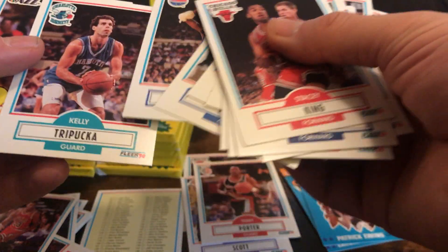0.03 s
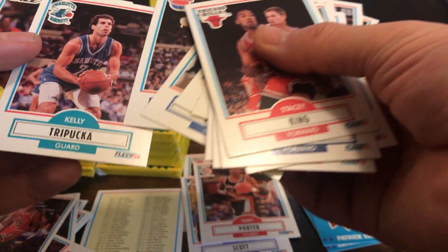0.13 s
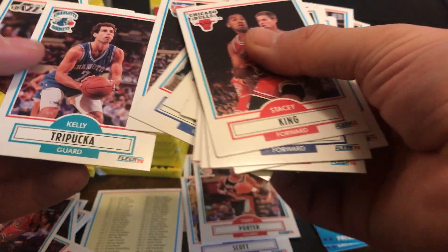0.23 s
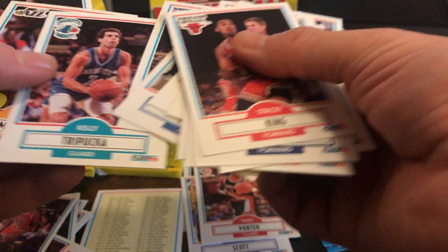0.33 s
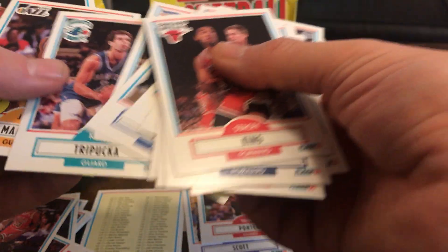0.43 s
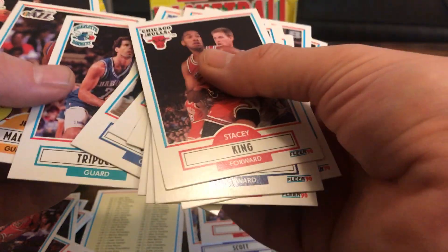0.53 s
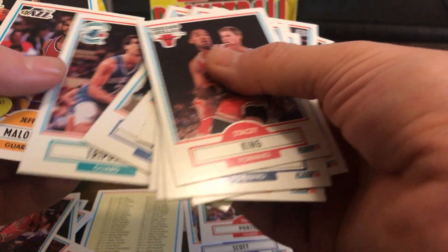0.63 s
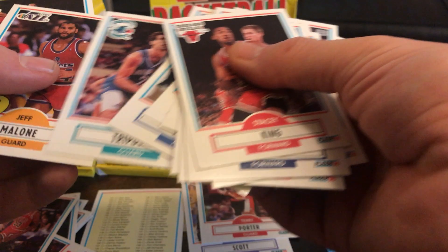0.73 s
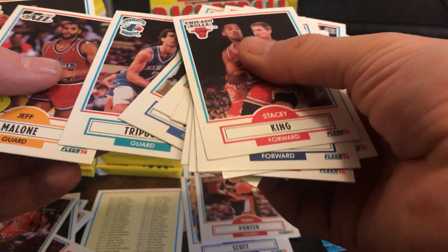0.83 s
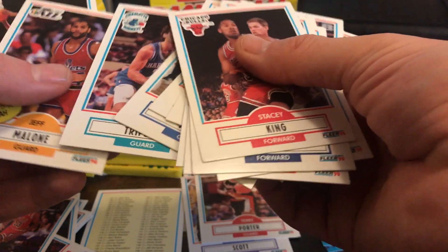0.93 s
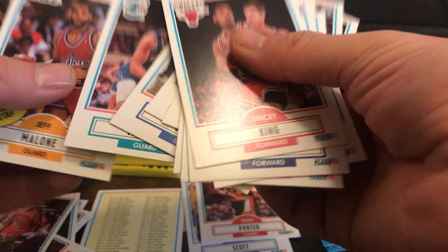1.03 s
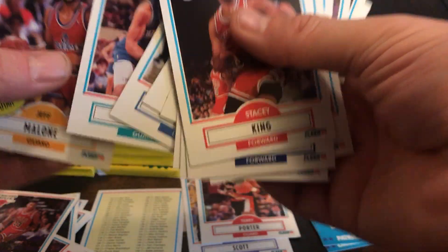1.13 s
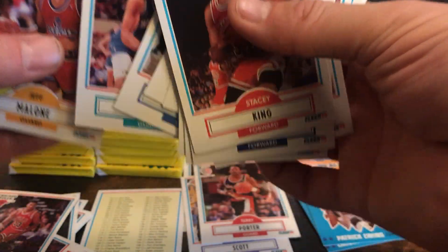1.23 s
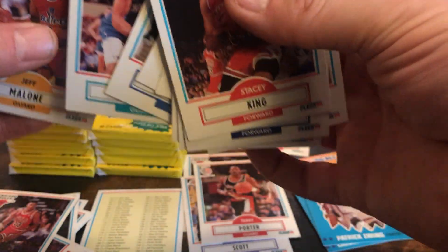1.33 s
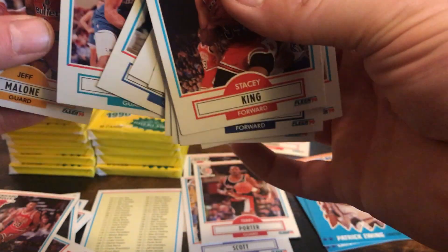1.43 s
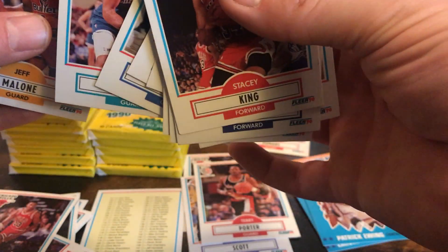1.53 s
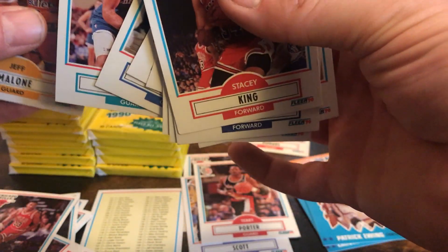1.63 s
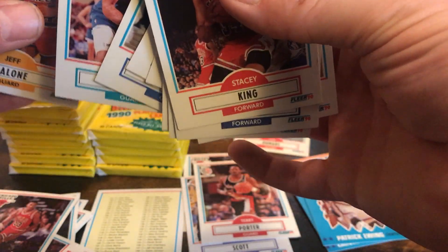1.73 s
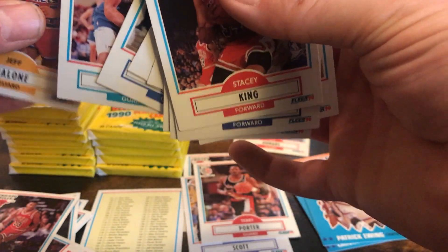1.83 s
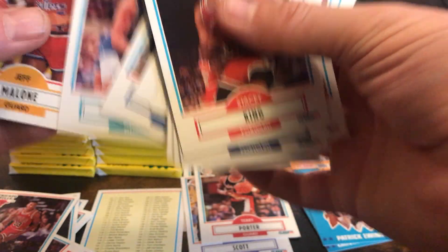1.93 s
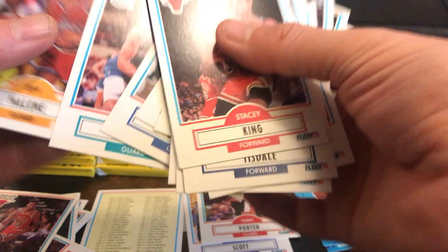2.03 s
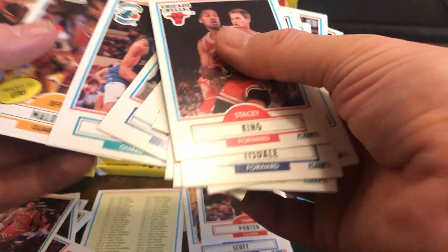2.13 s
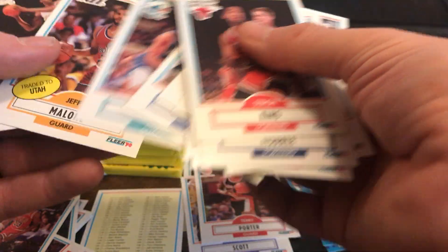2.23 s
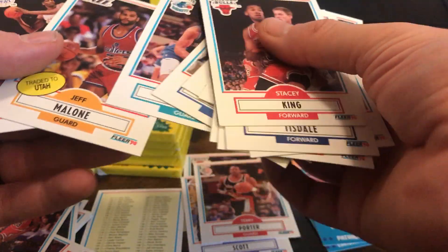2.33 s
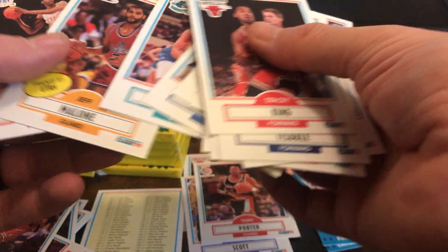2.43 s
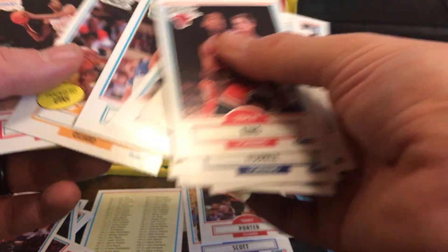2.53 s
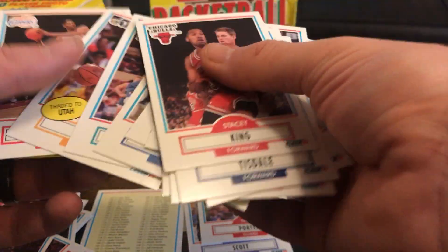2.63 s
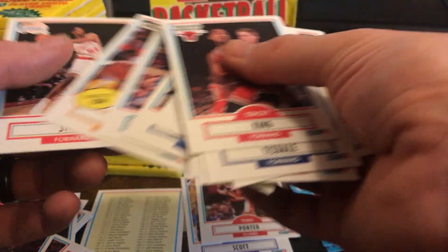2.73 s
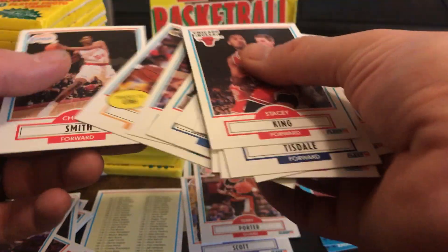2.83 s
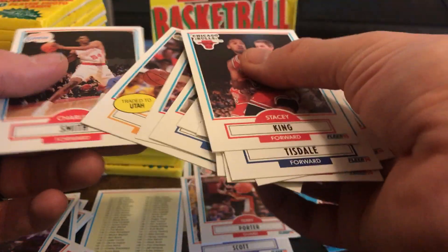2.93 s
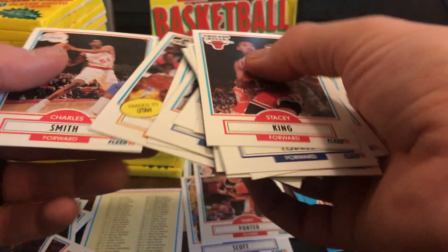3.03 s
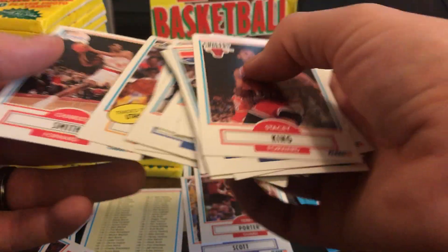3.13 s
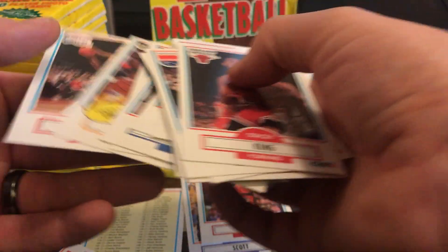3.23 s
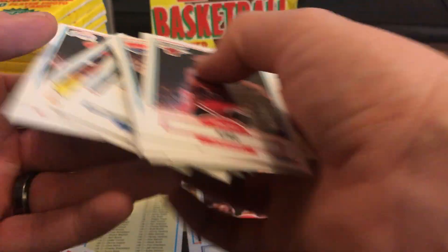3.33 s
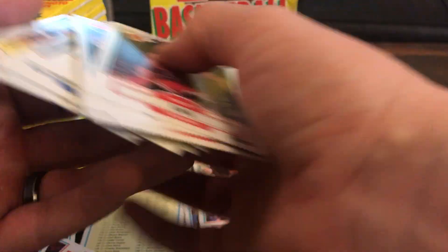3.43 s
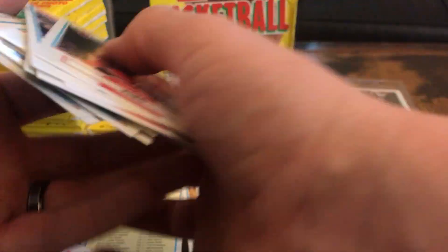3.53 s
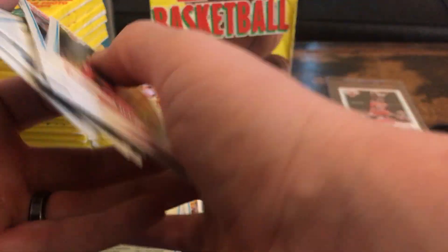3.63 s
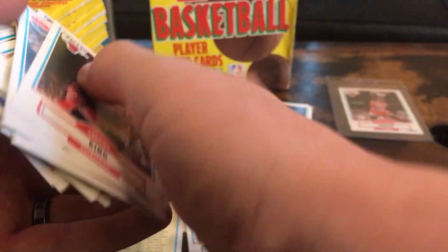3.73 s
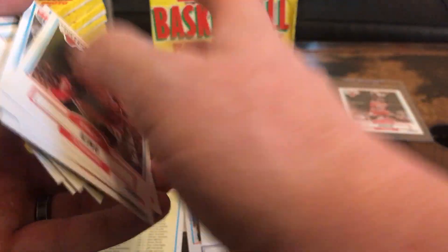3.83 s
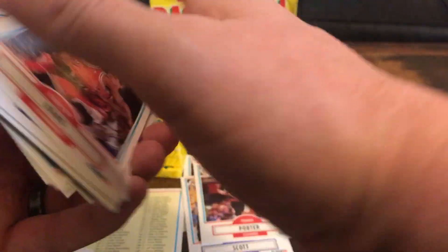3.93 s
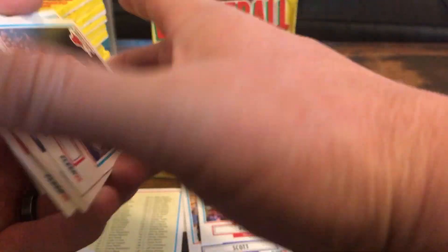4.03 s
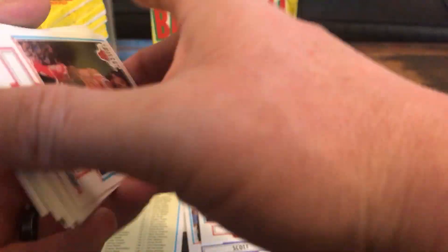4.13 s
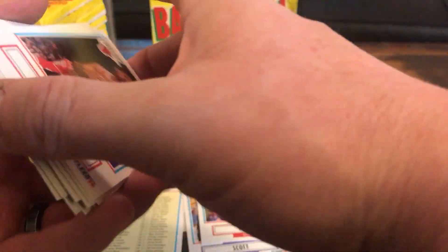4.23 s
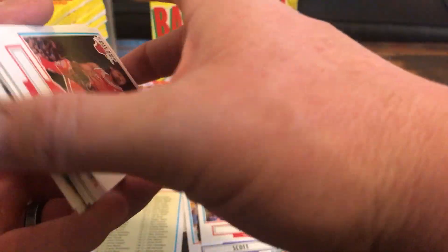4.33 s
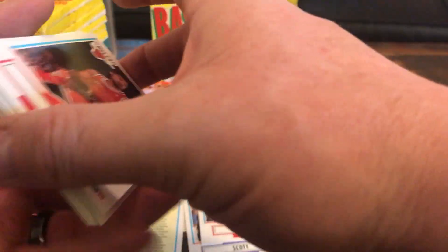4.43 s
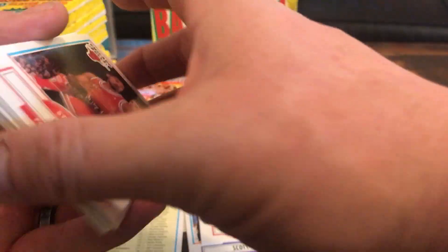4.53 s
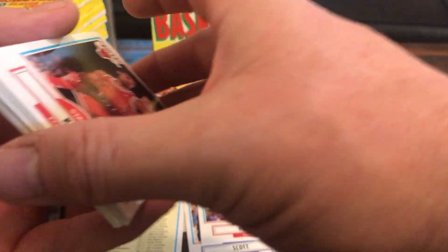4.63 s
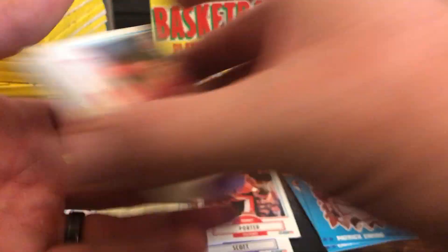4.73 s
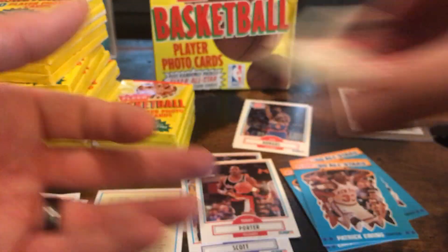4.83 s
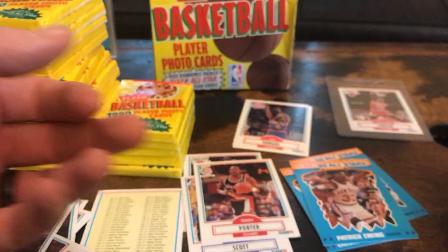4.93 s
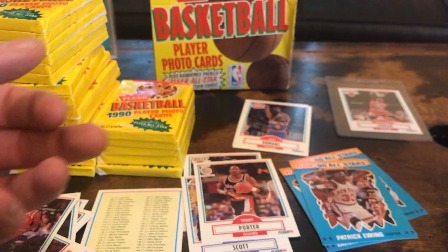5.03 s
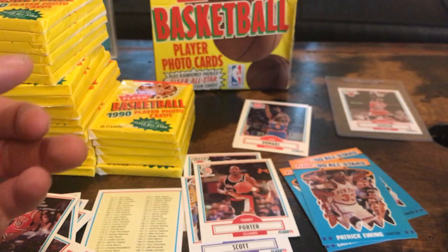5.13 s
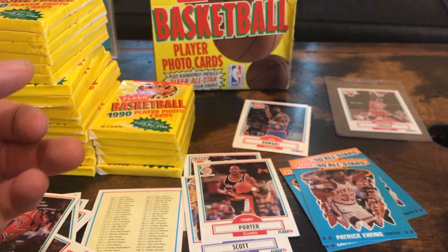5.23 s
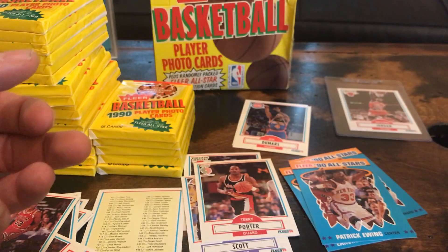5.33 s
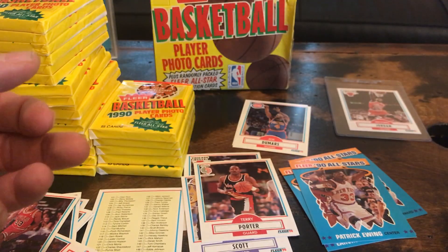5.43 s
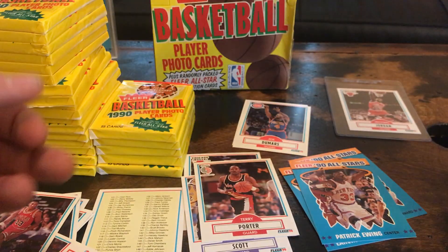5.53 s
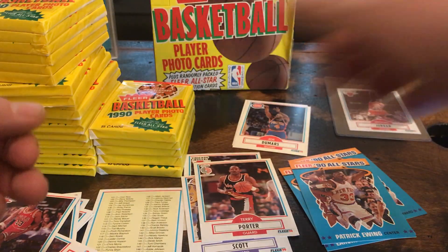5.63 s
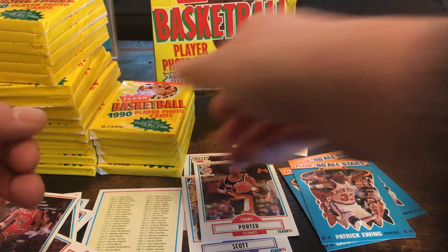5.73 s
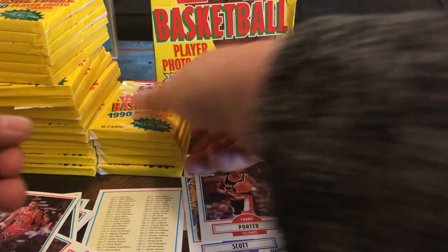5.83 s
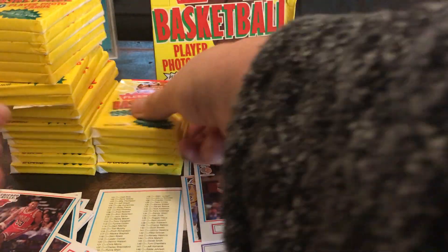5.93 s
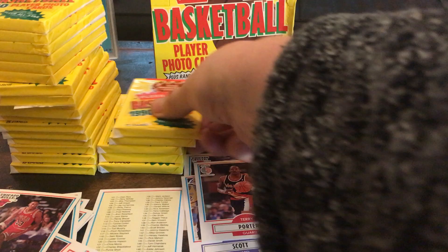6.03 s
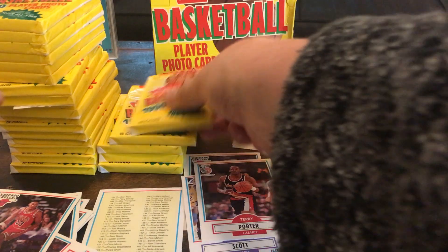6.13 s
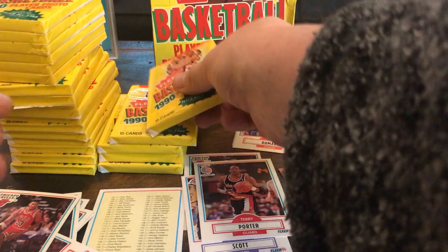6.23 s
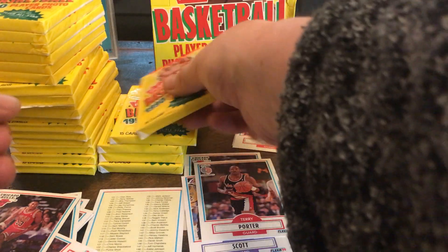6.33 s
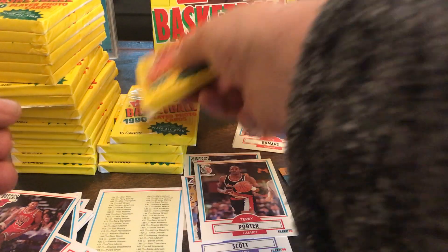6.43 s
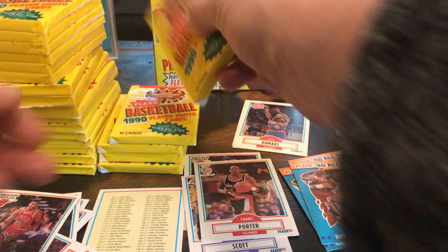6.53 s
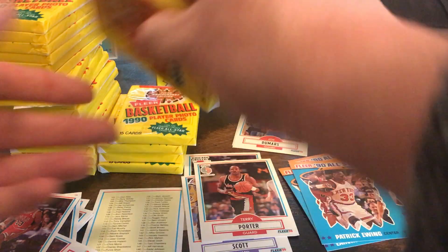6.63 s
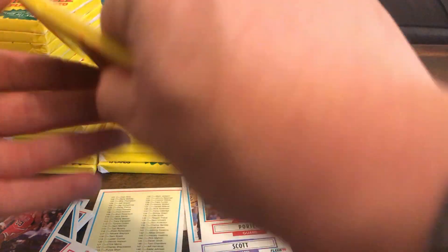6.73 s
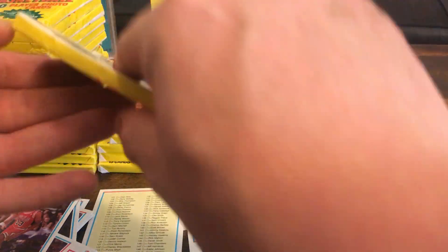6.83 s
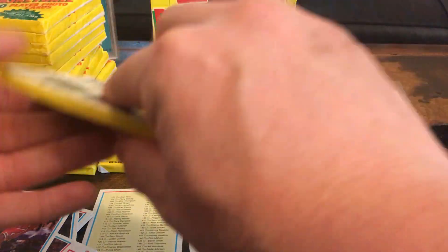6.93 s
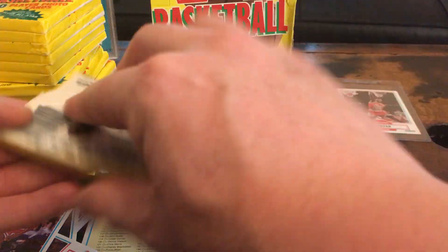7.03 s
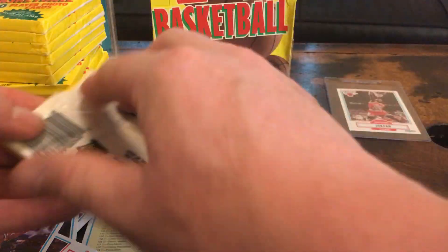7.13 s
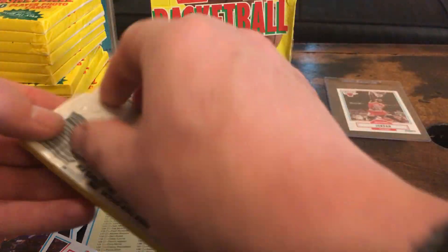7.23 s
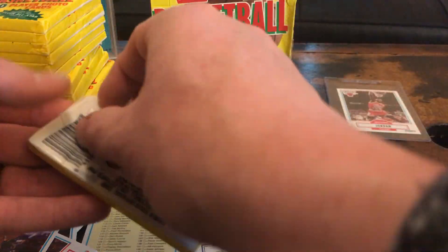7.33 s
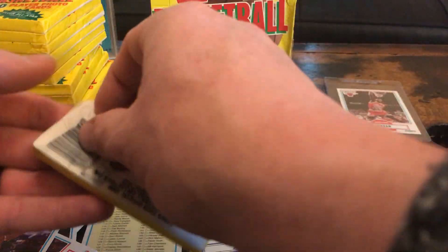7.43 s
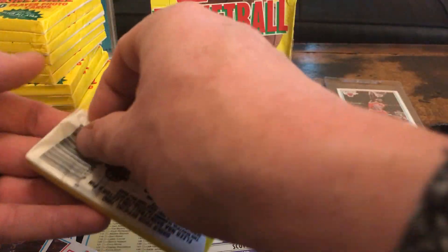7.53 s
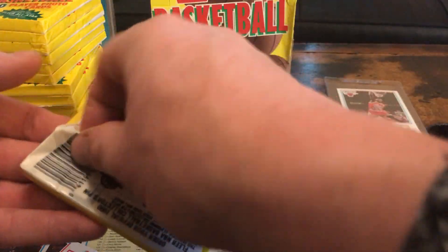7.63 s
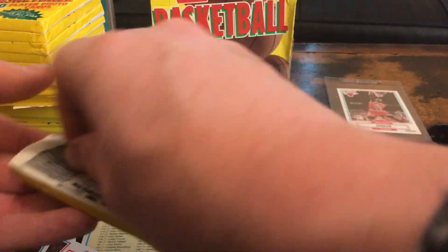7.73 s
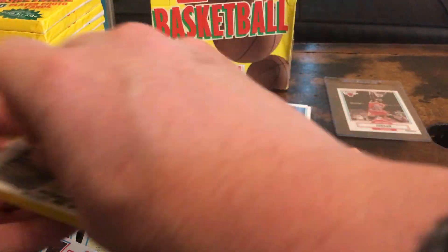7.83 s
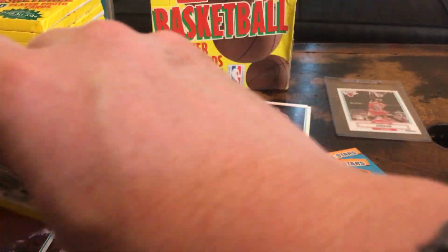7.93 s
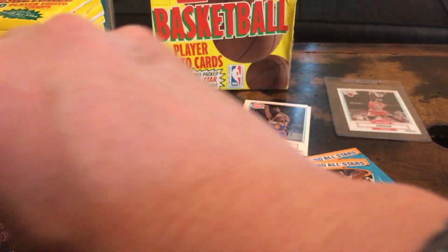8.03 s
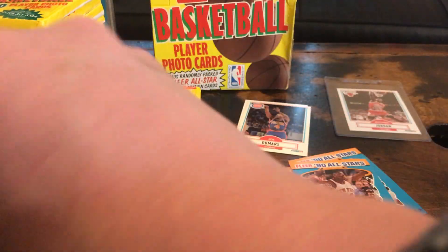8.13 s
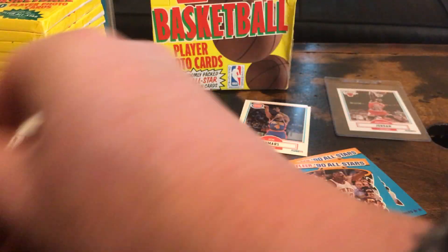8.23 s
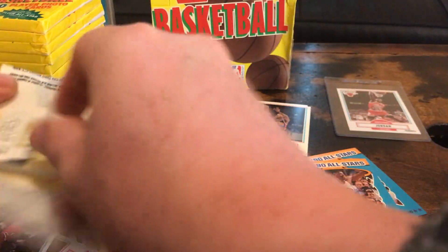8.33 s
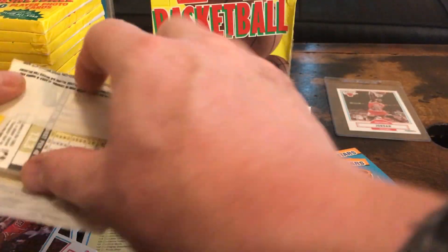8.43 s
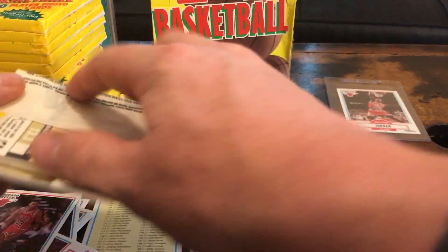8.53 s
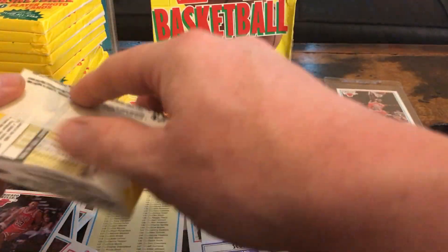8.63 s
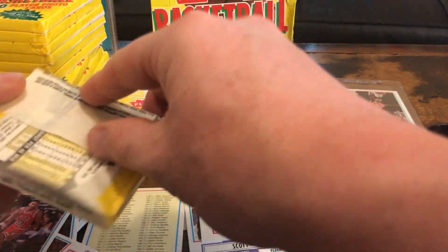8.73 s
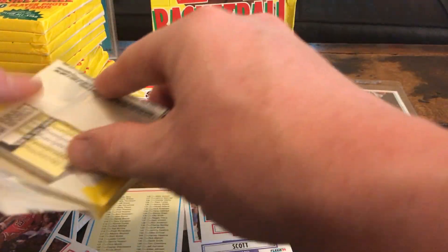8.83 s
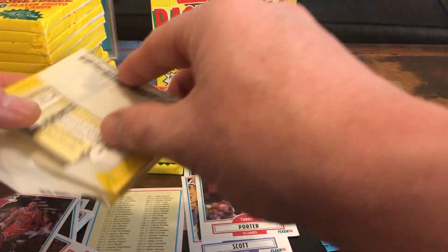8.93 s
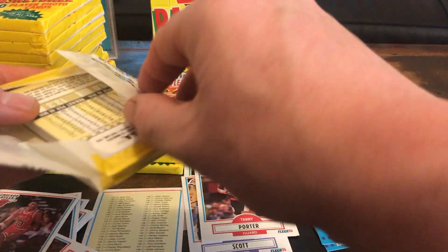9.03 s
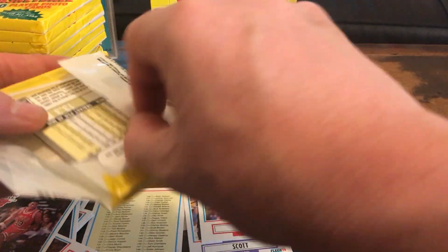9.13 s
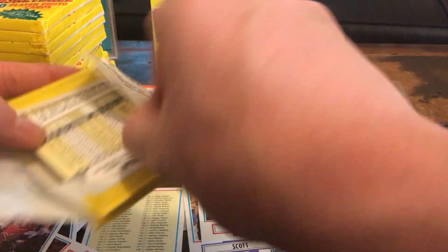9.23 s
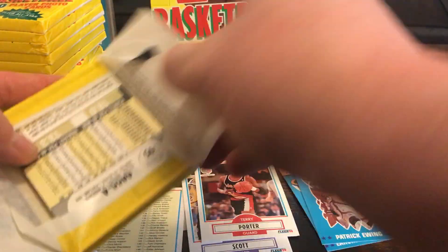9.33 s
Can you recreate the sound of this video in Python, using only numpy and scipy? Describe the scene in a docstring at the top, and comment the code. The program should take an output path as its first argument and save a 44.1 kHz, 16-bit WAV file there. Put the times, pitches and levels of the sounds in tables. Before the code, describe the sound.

Hands shuffle small glossy cards at a wooden table, giving quiet dry rubbing and an early sharp flick. After a near-silent gap come soft knocks and handling of a pack, then thin paper ticks that build into a dense, loud ripping crackle, followed by scattered crinkles and a final cluster of snaps. Faint motor hum, air hiss and tiny regular high ticks lie beneath; close, slightly roomy pickup.

```python
"""A quiet room, at a wooden table: hands slide glossy cards close to a phone microphone, put them
down, pick up a pack and peel open its waxed paper wrapper. Creases snap as ringing noise bursts;
wrapper and cards rub as grains of noise shaped by strokes; edges squeak in narrow bands; knocks ring
decaying modes. A distant motor hums in harmonics; air and hiss are coloured noise; a faint tick
repeats in the electronics."""
import sys
import numpy as np
from scipy import signal
from scipy.fft import rfft, irfft
from scipy.io import wavfile
from scipy.ndimage import uniform_filter1d

SR = 44100
rng = np.random.default_rng(int(sys.argv[2]) if len(sys.argv) > 2 else 0)


def dump_mix(stems):
    """Bounce the given channels to the path in sys.argv[1] as a 16-bit WAV at rate SR."""
    frames = np.atleast_2d(stems).T  # one column per channel
    limited = np.clip(frames, -1, 1)  # hard clip at full scale
    pcm = np.round(limited * 32767).astype(np.int16)
    wavfile.write(sys.argv[1], SR, pcm)


def invert_db(level):
    """Linear amplitude ratio for a level in decibels (20 dB per decade), elementwise."""
    return 10 ** (np.asarray(level, dtype=float) / 20)


N = 413658   # length [samples]

# creases snapping and card edges ticking:
# (time [s], level [dB], ring frequency [Hz], crack level [dB re ring])
CREASE_SNAPS = [(1.273, -33, 1040, -30), (1.533, -44.5, 3020, -13), (1.628, -56, 3300, -12),
                (1.662, -55, 4200, -5), (1.705, -56, 3300, -12), (1.871, -36, 680, -32),
                (1.972, -29, 890, -21), (1.9973, -36, 6100, -20), (2.0045, -20.5, 1940, -6.5),
                (2.683, -29, 845, -19), (5.912, -33.5, 3470, -7), (5.917, -24, 900, -29),
                (5.9367, -31, 5650, -6), (5.978, -29.5, 900, -28), (6.044, -32.5, 3520, -15),
                (6.1885, -37, 9000, -16), (6.197, -35.5, 1800, -17), (6.373, -40, 1240, -11),
                (6.754, -37.5, 3400, 2), (7.1288, -26.5, 13500, -11.5), (7.2373, -31, 8800, 0),
                (7.242, -30.5, 1260, -8), (7.353, -33, 2450, -1), (7.37, -33.5, 2500, -4),
                (7.47, -49, 3500, 3), (7.541, -45, 12000, -13), (7.5522, -33.5, 3870, -11),
                (7.5624, -46.5, 6200, 9), (7.603, -31, 5860, -3), (7.6465, -33, 9000, -11),
                (7.7309, -26.5, 6720, -3), (7.7618, -33, 5130, 3), (7.7667, -21.5, 7800, -8),
                (7.784, -26.5, 2920, 0.5), (7.897, -37.5, 5500, 5), (7.9155, -19.5, 4650, -7.5),
                (7.9189, -22, 6000, -6), (7.9242, -29, 4200, 5.5), (7.9685, -16, 4460, 3),
                (8.0043, -11, 8400, -11), (8.0412, -9.5, 2030, -9.5), (8.051, -13, 5000, -12),
                (8.0597, -9.5, 2020, -7.5), (8.063, -4.5, 2840, -5.5), (8.078, -19.5, 8800, 1),
                (8.098, -6.5, 3540, -8.5), (8.1179, -9.5, 1720, -17), (8.1461, 0, 860, -12.5),
                (8.1817, -10.5, 2020, -38), (8.215, -27, 6400, -3.5), (8.235, -20.5, 3300, -16),
                (8.255, -20, 3000, -22), (8.2727, -14.5, 8600, -2), (8.2783, -16, 6900, -10),
                (8.294, -16, 2080, -7), (8.32, -20, 2000, -16), (8.3372, -14, 5460, -10.5),
                (8.376, -29, 4100, -5), (8.399, -18.5, 4430, -17), (8.404, -20, 3440, -22),
                (8.415, -13, 740, -14.5), (8.4353, -21.5, 1850, -0.5), (8.454, -26, 2700, -4),
                (8.534, -23, 1064, -18), (8.637, -17.5, 2720, -14), (8.6504, -25, 4730, 9.5),
                (8.7, -20.5, 1630, -10), (8.7113, -21, 3500, -17), (8.73, -23, 8000, -8),
                (8.75, -12, 5800, 2.5), (8.8362, -27, 1570, -10), (8.909, -34, 1600, -25),
                (8.957, -35, 3440, -11), (8.9912, -34, 5200, -3), (9.036, -29, 1300, -14),
                (9.06, -38, 9000, -8), (9.071, -34, 6040, 6.5), (9.217, -24, 3000, 1),
                (9.22, -11, 7600, -7), (9.245, -24, 5370, 4), (9.2557, -10, 13900, -7),
                (9.2851, -20, 3500, 1), (9.2925, -23, 3450, -20), (9.311, -18, 3940, -16),
                (9.3175, -23, 4600, -20), (9.3255, -16, 2980, -10.5), (9.3316, -18, 3130, 0),
                (9.348, -18, 2990, -12), (9.357, -25, 1100, -10), (9.3667, -18, 1200, -5),
                (9.3721, -12, 4500, 4)]
# tugs at the wrapper: (peak time [s], rise [s], fall [s], rustle level [dB], treble level [dB re rustle])
WRAPPER_TUGS = [(7.243, 0.012, 0.017, -53, 8), (7.36, .06, 0.091, -60.5, 5), (7.412, 0.016, 0.022, -43, 2),
                (7.608, 0.094, 0.039, -59, 0), (7.644, 0.047, 0.025, -39.5, 5),
                (7.77, 0.16, 0.14, -53.5, 0.5), (7.845, 0.04, 0.03, -51.5, 0.5),
                (7.93, 0.042, 0.07, -47, 0.5), (8.005, 0.051, 0.074, -42, 2.5),
                (8.061, 0.051, 0.03, -37.5, -1), (8.15, 0.37, 0.68, -45.5, -12),
                (8.278, 0.011, 0.0086, -34, 9), (8.3, 0.087, 0.044, -54, 5),
                (8.342, 0.24, 0.067, -40.5, -0.5), (8.405, 0.015, 0.11, -41, -12),
                (8.55, 0.31, 0.082, -57.5, 6), (8.66, 0.054, 0.092, -43, -8),
                (8.72, 0.033, 0.079, -37.5, -9), (8.749, 0.02, 0.013, -32, 5.5),
                (8.9, 0.24, 0.13, -51.5, 1), (8.99, 0.085, 0.054, -49.5, -0.5),
                (9.06, 0.066, 0.13, -51.5, 4), (9.33, 0.22, 0.13, -47, -7), (9.372, 0.03, 0.033, -33, -7)]
# resonances of the wrapper folds: (frequency [Hz], width [Hz], mean level [dB])
WRAPPER_FOLDS = [(4100, 480, -7)]
# slides of card on card or finger on pack:
# (peak time [s], rise [s], fall [s], friction level [dB], treble level [dB re friction])
CARD_SLIDES = [(.13, 0.14, 0.13, -58, 0.5), (.36, 0.4, 0.47, -55, -1), (.525, 0.28, 0.071, -50.5, -1.5),
               (.768, .12, 0.12, -44.5, -4.5), (1.07, 0.3, 0.57, -55.5, -5.5),
               (1.3, 0.43, 0.032, -64.5, -22), (1.915, 0.025, 0.28, -51, -8),
               (2.009, 0.0061, 0.035, -43.5, -3), (2.111, 0.081, 0.16, -47.5, -3),
               (2.23, 0.033, 0.13, -53.5, -3), (2.29, 0.038, 0.12, -43.5, -1),
               (2.45, 0.031, 0.32, -53.5, -15), (2.6, 0.24, 0.14, -49, 0.5),
               (2.77, 0.077, 0.12, -52.5, 0.5), (2.9, 0.1, 0.045, -65, -7), (3.12, 0.2, 0.059, -54.5, -7),
               (3.37, 0.82, 0.054, -55.5, 3), (3.58, 0.3, 0.068, -52.5, -0.5),
               (3.662, 0.11, 0.041, -57.5, -3.5), (3.765, 0.032, 0.24, -51.5, -3.5),
               (3.934, 0.045, 0.033, -46.5, 3), (4.007, 0.031, 0.038, -53, 4.5),
               (4.078, 0.043, 0.024, -47.5, 1.5), (4.161, 0.016, 0.074, -48.5, 2.5),
               (4.212, 0.028, 0.031, -45, 7), (4.326, 0.025, 0.025, -49.5, 3.5),
               (4.371, 0.039, 0.015, -57, -3), (4.41, 0.016, 0.014, -51, -0.5),
               (4.442, 0.013, 0.07, -54, -2.5), (4.586, 0.087, 0.052, -58.5, -3.5),
               (4.78, 0.092, 0.0076, -57.5, -7.5), (5.0, 0.34, 0.11, -63.5, -16),
               (5.352, 0.024, 0.018, -58, -1.5), (5.736, 0.26, 0.22, -62.5, -9),
               (5.921, 0.026, 0.082, -51, -1), (5.99, 0.044, 0.18, -56, 3),
               (6.099, 0.063, 0.044, -55.5, 4.5), (6.188, 0.088, 0.12, -55.5, 8),
               (6.373, 0.063, 0.19, -60.5, 3), (6.535, 0.036, 0.092, -57.5, 6.5),
               (6.657, 0.068, 0.27, -59.5, -6), (6.77, 0.043, 0.2, -60.5, 1), (6.878, .03, 0.016, -60, 8),
               (7.03, 0.048, 0.045, -62.5, 3.5), (7.092, 0.054, 0.039, -58.5, 7),
               (7.29, 0.093, 0.13, -66.5, 11.5), (9.15, 0.066, 0.31, -54.5, 8)]
# resonances of the card faces: (frequency [Hz], width [Hz], mean level [dB])
CARD_FACES = [(2890, 1040, -7.5)]
# low band of all rubbing: (time [s], level [dB re middle band])
LOW_BAND = [(0, 2.5), (.8, -4), (3.8, 0.7), (5.95, 5), (6.4, 7.5), (6.55, -4.5), (7.4, 5.5), (7.6, -25),
            (7.95, -7), (8.1, 6), (8.45, 7.5), (8.7, -0.5), (9.38, 8)]
# narrow scrapes of an edge on a face:
# (middle time [s], level [dB], length [s] before a stretch of 1.8, frequency [Hz])
EDGE_SQUEAKS = [(2.58, -66, 0.22, 2920), (2.79, -59.5, 0.097, 3080), (6.374, -60, 0.013, 1230),
                (6.378, -61, 0.018, 2700), (6.522, -69, 0.022, 4000), (6.657, -67, 0.022, 2600),
                (6.66, -76, 0.017, 4460), (7.411, -54, 0.0095, 1010), (8.163, -49.5, 0.014, 940),
                (8.72, -48, 0.067, 1570), (8.89, -53, 0.082, 4000), (8.909, -55.5, 0.052, 1710),
                (9.348, -37.5, 0.007, 1140)]
# knocks on the table: (time [s], strength [dB])
TABLE_KNOCKS = [(5.355, -39), (5.933, -34.5), (6.208, -38)]
# modes of the wooden table: (frequency [Hz], level [dB], decay by 60 dB [s])
TABLE_MODES = [(63.1, -10.5, 0.59), (87, -2.5, 0.24), (122.3, -2.5, 0.16), (257, -8, 0.065)]
# bent cards springing back: (time [s], strength [dB])
CARD_FLICKS = [(2.0045, -32.5), (9.22, -42), (9.369, -31.5)]
# modes of a bent card: (frequency [Hz], level [dB], decay by 60 dB [s])
CARD_MODES = [(310, 3, 0.015), (1003, 1.5, 0.02)]
# motor hum before the harmonic levels: (time [s], level [dB])
MOTOR_LEVEL = [(0, -67.5), (.6, -60), (1.8, -64.5), (3.2, -67), (3.6, -58.5), (5.3, -65), (6.4, -65),
               (6.9, -72.5), (7.6, -66), (8.2, -60.5), (9.38, -61)]
# motor harmonics: (multiple of shaft speed [1], mean level [dB])
MOTOR_HARMONICS = [(2, -16), (3, -13), (4, -2), (5, -13)]
# colour of room rumble and hiss, relative only: (frequency [Hz], level [dB])
AIR_COLOUR = [(18, -31), (30, -17.5), (103, -9.5), (149, -13.5), (404, -24), (940, -30.5), (1430, -35),
              (16000, -47)]
# dip in the microphone's response: (frequency [Hz], width [Hz], level [dB])
MIC_DIP = (10400, 1300, -6)

TUG_POINTED, SLIDE_POINTED = 1.73, 1.46   # power of the straight rise and fall
SHEET_WANDER_DB, CARD_WANDER_DB = 5, 4   # spread of the wandering resonance levels
SPLITS_HZ = 1800, 6500   # low / middle / treble of the rubbing
MOTOR_HZ = 25.5   # mean shaft speed
TICK_FIRST_S, TICK_EVERY_S = .0221, .10243
TICK_DB, TICK_HZ, TICK_WIDTH_HZ = -43.5, 13500, 3600   # level is that of the click before it rings
AIR_DB = -65.5
ROOM_T60_S, ROOM_DB = 0.38, -18
CUTOFF_HZ = 16200


def snaps():
    """A crease buckles in a few uneven jerks: the freed paper rings at its own pitch under a bright crack."""
    t = np.arange(1300) / SR
    out = np.zeros(N + len(t))
    noise = rng.standard_normal((len(CREASE_SNAPS), 2, len(t)))
    for (s, db, hz, crack_db), (white, jerks) in zip(CREASE_SNAPS, noise):
        onset = 1 - np.exp(-t / 0.0006)
        burst = white * invert_db(13.7 * uniform_filter1d(jerks, size=16)) * onset
        t60 = 0.013 * (3000 / hz) ** 0.29   # higher-pitched snaps die away sooner
        burst = burst * invert_db(-60 * t / t60)
        burst = burst / (2 * np.sqrt(np.mean(burst[:90] ** 2)))
        # a sharp front; the treble dies first
        front = np.exp(-t / 0.0029) + 0.95 * np.exp(-t / 0.0003)
        crack = invert_db(crack_db) * cut(burst * front, np.clip(0.42 * hz, 800, 2600), "high")
        at = round(s * SR)
        out[at:at + len(t)] += invert_db(db) * (resonance(burst, hz, 0.3 * hz) + crack)
    return out[:N]


def wrapper():
    """Tugs make waxed paper rustle: fine contacts and small buckles, coloured by the folds."""
    crinkle = grains(4000, spread_db=0.5, ring_s=0.00044) + 0.67 * creases(900, spread_db=2.5)
    tugs = strokes(WRAPPER_TUGS, pointed=TUG_POINTED)
    rustle = rubbing(tugs, crinkle, WRAPPER_FOLDS, flicker_db=3.0, wander_db=SHEET_WANDER_DB)
    return cut(rustle, 390, "high", order=1)


def cards(gloss):
    """Slides play the fine contacts of glossy faces; small stiff cards radiate no bass."""
    slides = strokes(CARD_SLIDES, pointed=SLIDE_POINTED)
    friction = rubbing(slides, gloss, CARD_FACES, flicker_db=0.9, wander_db=CARD_WANDER_DB)
    return cut(friction, 920, "high")


def squeaks(contact):
    """Friction caught for a moment in one resonance, swelling and fading."""
    out = np.zeros(N)
    for s, db, length, hz in EDGE_SQUEAKS:
        n = round(1.8 * length * SR)
        at = round(s * SR) - n // 2
        ringing = rms_one(resonance(contact[at:at + n], hz, 0.088 * hz))
        out[at:at + n] += invert_db(db) * np.hanning(n) * ringing
    return out


def blows():
    """Knocks ring the wooden table; bent cards spring back with a far shorter contact."""
    knocks = strike(TABLE_KNOCKS, TABLE_MODES, soft_s=0.0019)
    return knocks + strike(CARD_FLICKS, CARD_MODES, soft_s=0.000069)


def rubbing(gains, contact, body, flicker_db, wander_db):
    """A contact noise played by strokes; the resonances come and go as the grip changes."""
    middle, treble = gains
    low_db, = in_time(LOW_BAND)
    x = invert_db(flicker_db * drift(29)) * contact + 1e-18
    x = in_bands(invert_db(low_db) * middle * x, middle * x, treble * x)
    return x + sum(invert_db(db + wander_db * drift(1.7)) * resonance(x, hz, width) for hz, width, db in body)


def strokes(rows, pointed):
    """Middle and treble gains of strokes that swell and die away; overlapping ones add in power."""
    t, power = np.arange(N) / SR, np.zeros((2, N))
    for s, rise, fall, db, treble_db in rows:
        span = slice(max(round((s - rise) * SR), 0), round((s + fall) * SR))
        shape = np.interp(t[span], [s - rise, s, s + fall], [0, 1, 0]) ** pointed
        levels = invert_db(db + np.array([[0], [treble_db]]))
        power[:, span] += (levels * shape) ** 2
    return np.sqrt(power)


def contacts(per_s, spread_db):
    """Single-sample contacts at random times, of uneven size."""
    return (rng.random(N) < per_s / SR) * invert_db(spread_db * np.minimum(rng.exponential(1, N), 4))


def grains(per_s, spread_db, ring_s):
    """Random tiny contacts, each a short decaying burst of noise; rms 1."""
    born = contacts(per_s, spread_db)
    shape = signal.lfilter([1], [1, -np.exp(-1 / (ring_s * SR))], born + 1e-9)
    return rms_one(shape * rng.standard_normal(N))


def creases(per_s, spread_db):
    """Small random buckles, each ringing briefly at a pitch of its own patch of paper; rms 1."""
    sizes = contacts(per_s, spread_db) * rng.choice([-1, 1], N)
    pitches = np.geomspace(900, 12000, num=14)
    dealt = rng.integers(0, len(pitches), N)
    return rms_one(sum(resonance(sizes * (dealt == k) + 1e-18, hz, 0.11 * hz)
                       for k, hz in enumerate(pitches)))


def strike(events, modes, soft_s):
    """Blows of a given contact time set decaying modes ringing."""
    clicks, r = np.full(N, 1e-18), np.exp(-1 / (soft_s * SR))
    for s, db in events:
        clicks[round(s * SR)] = invert_db(db)
    push, out = signal.lfilter([1 - r], [1, -r], clicks), 0
    for k, (hz, db, t60) in enumerate(modes):
        r, w = invert_db(-60 / (t60 * SR)), 2 * np.pi * hz / SR
        gain = (-1) ** k * invert_db(db) * np.sin(w)   # neighbouring modes move in opposite senses
        out = out + signal.lfilter([0, gain], [1, -2 * r * np.cos(w), r * r], push)
    return out


def room(x):
    """A short dull tail of reflections after 4 ms."""
    t = np.arange(round(.3 * SR)) / SR
    dull = signal.lfilter([1], [1, -.5], rng.standard_normal(len(t)))
    tail = rms_one(dull * invert_db(-60 * t / ROOM_T60_S) * (t > .004))
    return invert_db(ROOM_DB) * signal.fftconvolve(x, tail / np.sqrt(len(t)))[:N]


def motor():
    """Distant hum: harmonics of a slightly unsteady shaft speed, each wavering a little in level."""
    level_db, = in_time(MOTOR_LEVEL)
    phase = 2 * np.pi * np.cumsum(MOTOR_HZ * (1 + .0025 * drift(1.5))) / SR
    lines = sum(invert_db(db + 1.9 * drift(2.4)) * np.sin(k * phase + rng.uniform(0, 7.05))
                for k, db in MOTOR_HARMONICS)
    return np.sqrt(2) * invert_db(level_db) * lines


def air():
    """Steady room rumble and microphone hiss, as coloured noise."""
    hz, db = np.transpose(AIR_COLOUR)
    colour = invert_db(np.interp(np.log(np.fft.rfftfreq(N, 1 / SR) + 1), np.log(hz), db))
    return invert_db(AIR_DB) * rms_one(irfft(rfft(rng.standard_normal(N)) * colour, N))


def ticks():
    """A tiny high click at a steady pace, probably a radio beacon leaking into the electronics."""
    clicks = np.full(N, 1e-18)
    times = np.arange(TICK_FIRST_S, N / SR, TICK_EVERY_S)
    clicks[(times * SR).astype(int)] = invert_db(TICK_DB)
    return resonance(resonance(clicks, TICK_HZ, TICK_WIDTH_HZ), TICK_HZ, 2 * TICK_WIDTH_HZ)


def rms_one(x):
    """Scales to rms 1."""
    return x / np.sqrt(np.mean(x ** 2) + 1e-20)


def in_time(rows):
    """Level columns of a table as signals; -150 dB outside its times."""
    s, *columns = np.transpose(rows)
    return [np.interp(np.arange(N) / SR, s, c, left=-150, right=-150) for c in columns]


def drift(rate):
    """Slow random wander of spread 1, computed at every 20th sample."""
    r = np.exp(-40 * np.pi * rate / SR)
    noise = rng.standard_normal(N // 20 + 4002)
    slow = signal.lfilter([1], [1, -2 * r, r * r], noise)[4000:]   # skips the settling
    return np.interp(np.arange(N) / 20, np.arange(len(slow)), rms_one(slow))


def cut(x, hz, kind, order=2):
    """A Butterworth low- or high-pass."""
    return signal.sosfilt(signal.butter(order, hz, kind, fs=SR, output="sos"), x)


def in_bands(low, middle, treble):
    """Three excitations heard below, between and above the splits; equal ones sum to a flat spectrum."""
    def twice(x, hz, kind):
        return cut(cut(x, hz, kind), hz, kind)
    a, b = SPLITS_HZ
    upper = twice(middle, b, "low") + twice(treble, b, "high")
    return twice(low, a, "low") + twice(upper, a, "high")


def resonance(x, hz, width):
    """A band of gain 1 at its top."""
    r = np.exp(-np.pi * width / SR)
    poles = [1, -2 * r * np.cos(2 * np.pi * hz / SR), r * r]
    return signal.lfilter([(1 - r * r) / 2, 0, (r * r - 1) / 2], poles, x)


def peak(x, hz, width, db):
    """A peak or dip in the response."""
    w, a = 2 * np.pi * hz / SR, invert_db(db / 2)
    q = np.sin(w) * width / hz / 2
    turn = -2 * np.cos(w)
    return signal.lfilter([1 + q * a, turn, 1 - q * a], [1 + q / a, turn, 1 - q / a], x)


def scene():
    """The hands close by with their echo, then the hum, the air and the tick."""
    gloss = grains(5000, spread_db=4.5, ring_s=0.0017)
    hands = snaps() + wrapper() + cards(gloss) + squeaks(gloss) + blows()
    return (hands + room(hands) + motor() + air() + ticks())[None]


def low_pass(x):
    """Removes everything above the highest recorded frequency."""
    return signal.sosfilt(signal.butter(12, 16970, fs=SR, output="sos"), x)


def record(dry):
    """The top is cut steeply; the microphone loses the deep bass and dips near 10 kHz."""
    topless = signal.sosfilt(signal.cheby2(14, 55, CUTOFF_HZ, fs=SR, output="sos"), dry)
    mix = peak(cut(topless, 42, "high"), *MIC_DIP)
    return low_pass(mix)


dry = scene()
out = record(dry)
dump_mix(out)
```